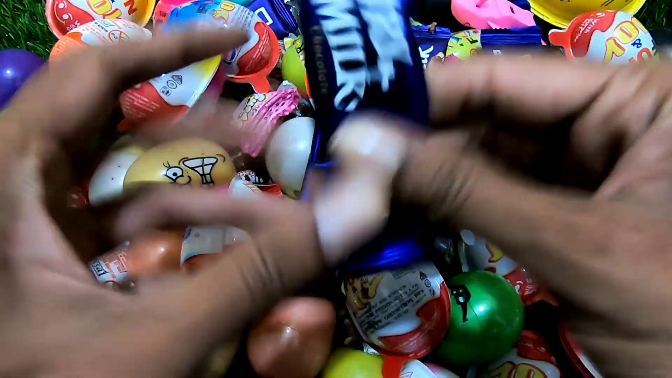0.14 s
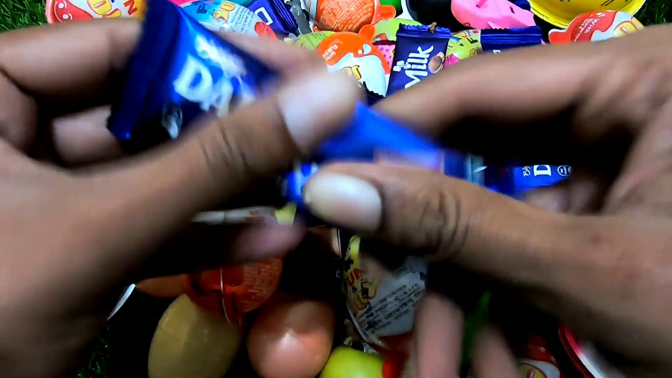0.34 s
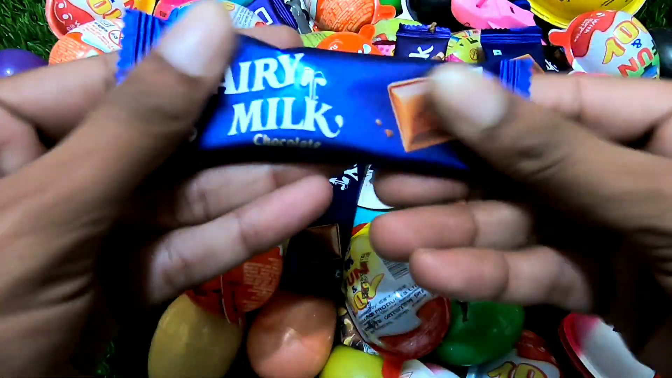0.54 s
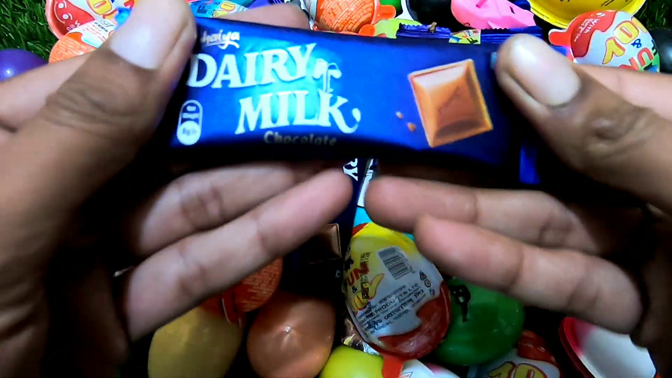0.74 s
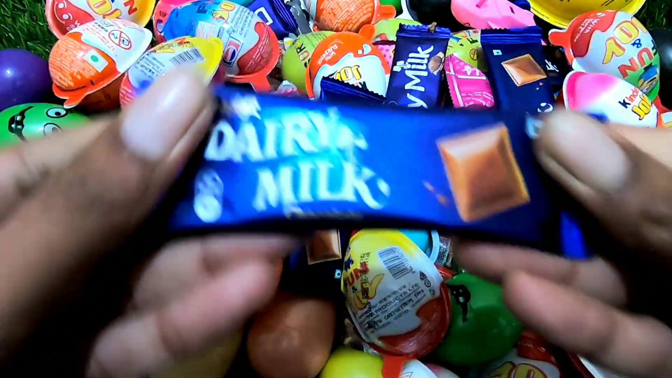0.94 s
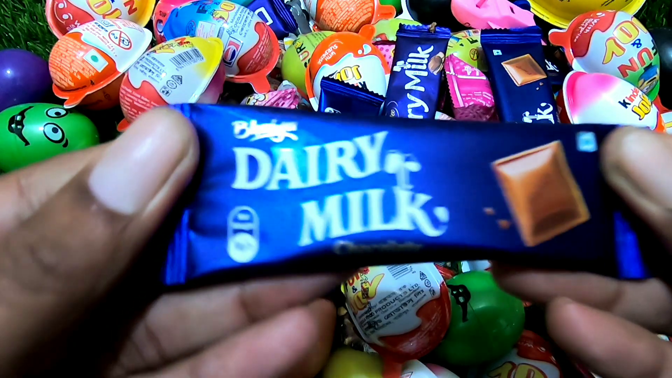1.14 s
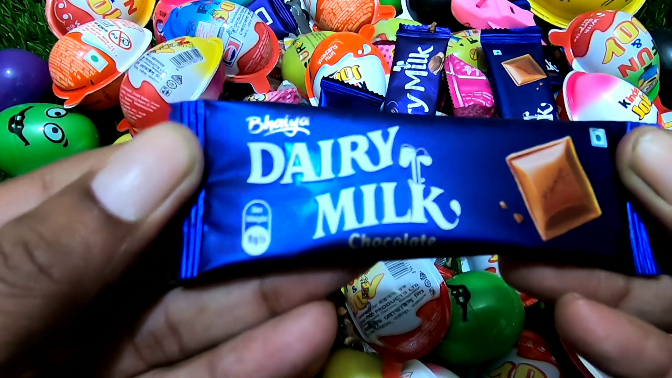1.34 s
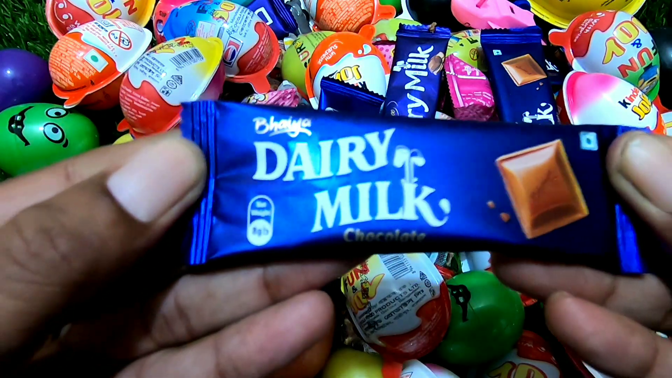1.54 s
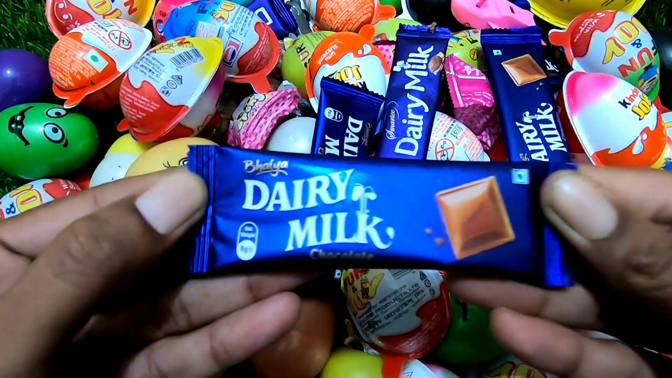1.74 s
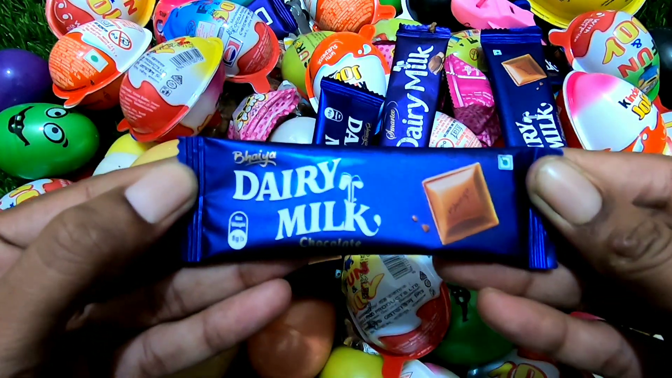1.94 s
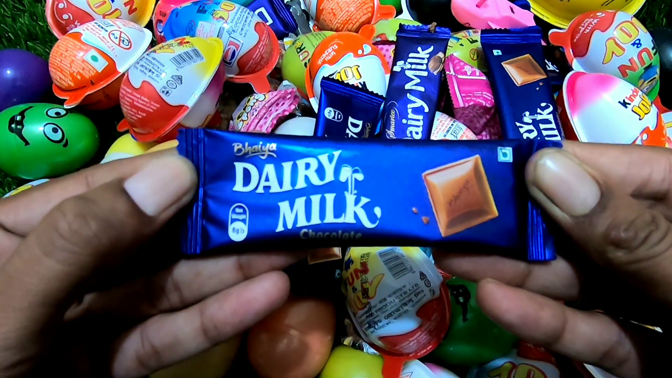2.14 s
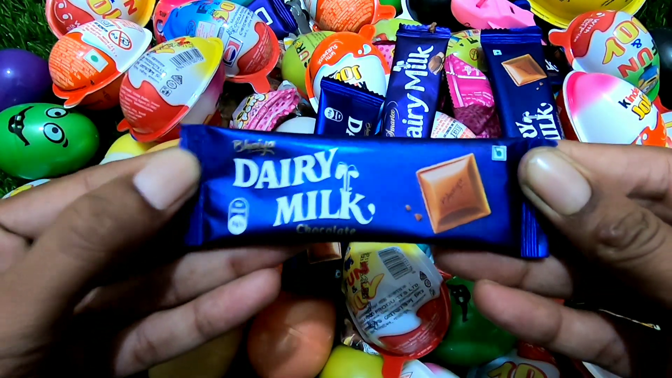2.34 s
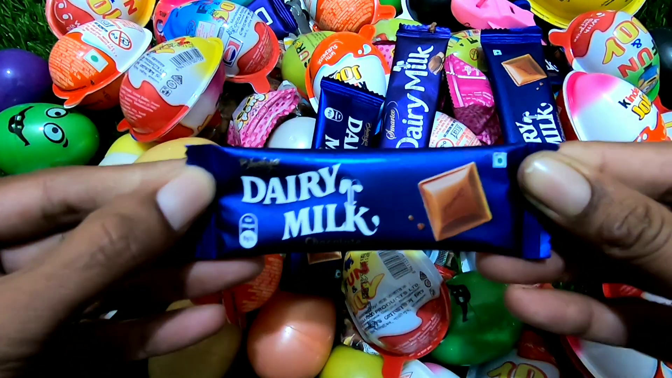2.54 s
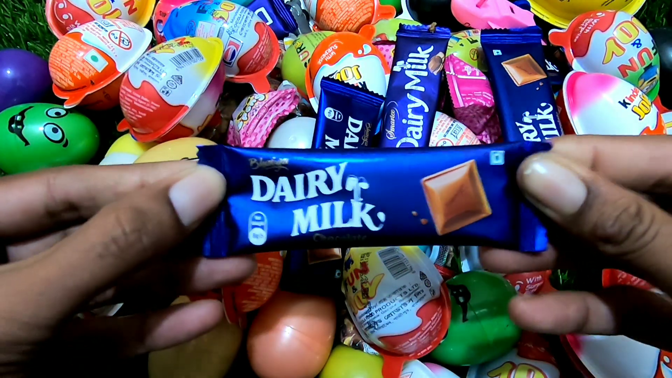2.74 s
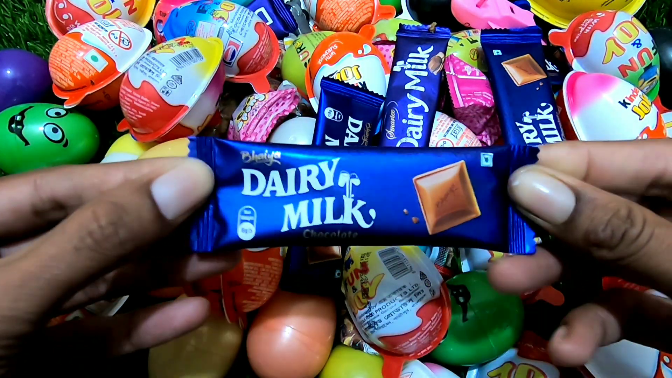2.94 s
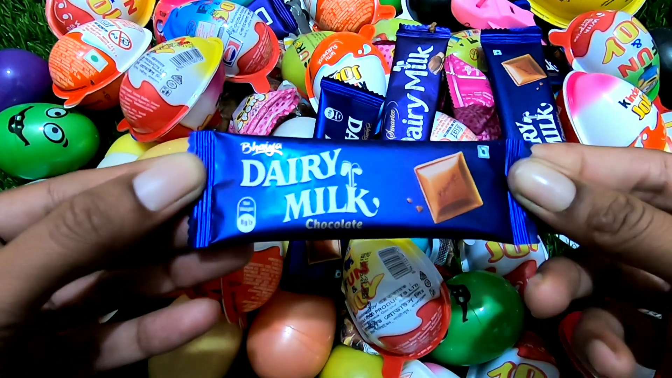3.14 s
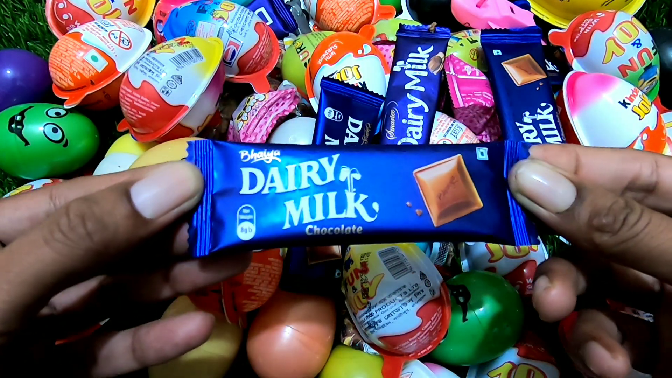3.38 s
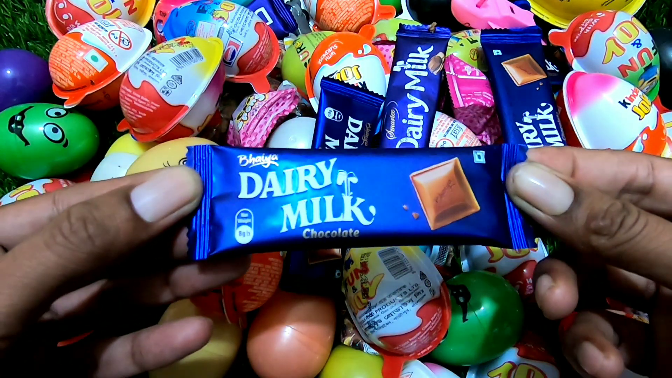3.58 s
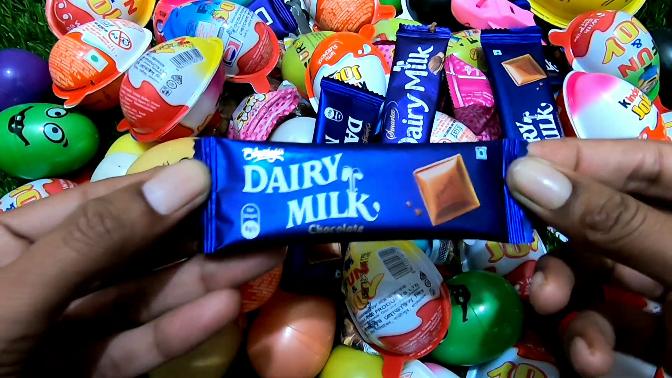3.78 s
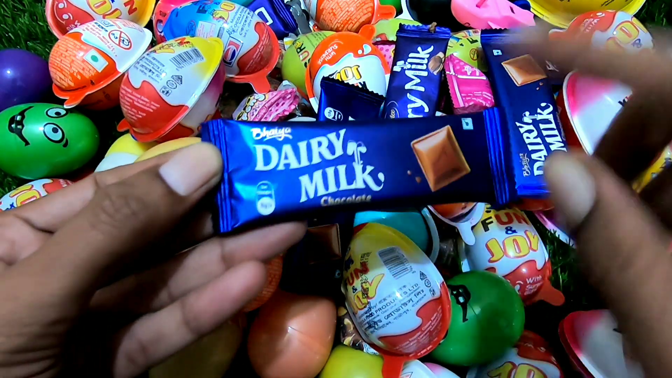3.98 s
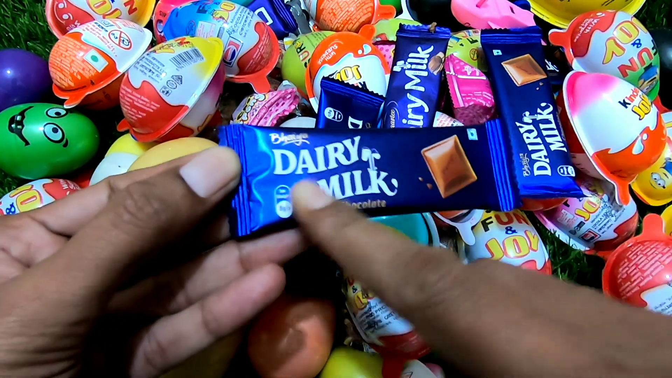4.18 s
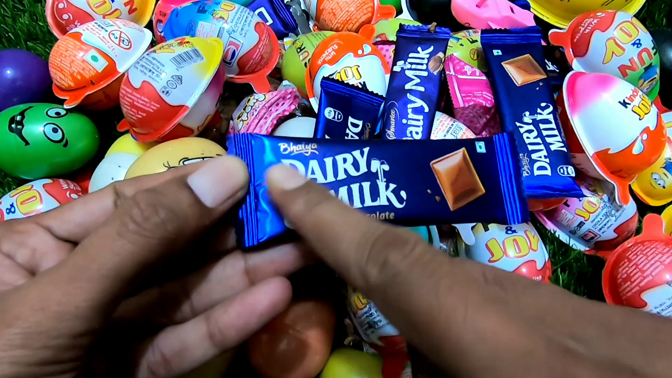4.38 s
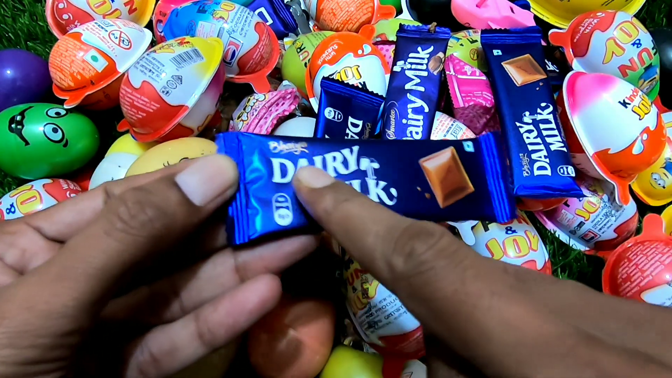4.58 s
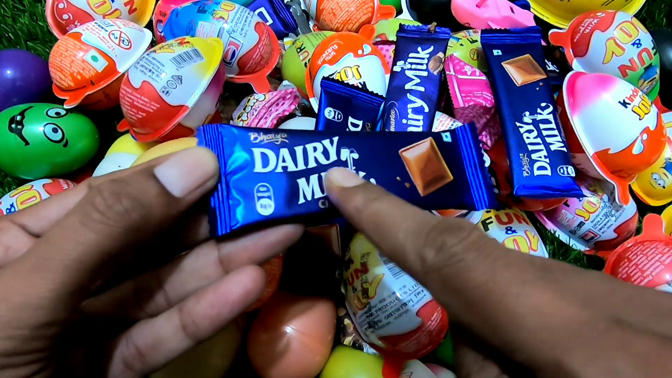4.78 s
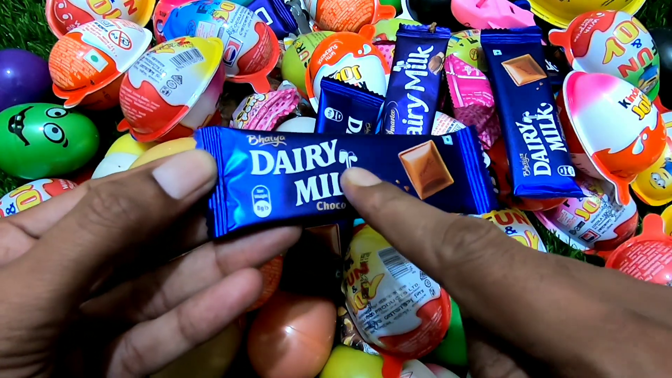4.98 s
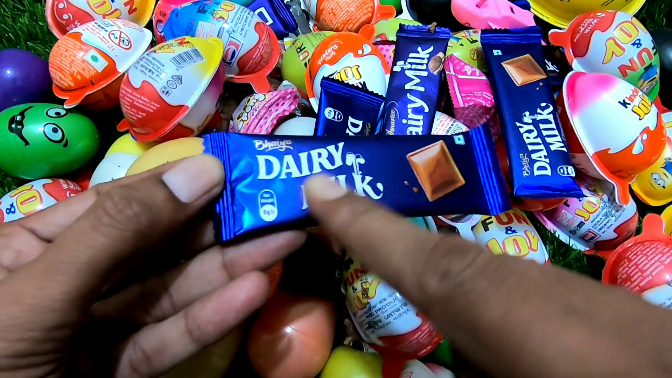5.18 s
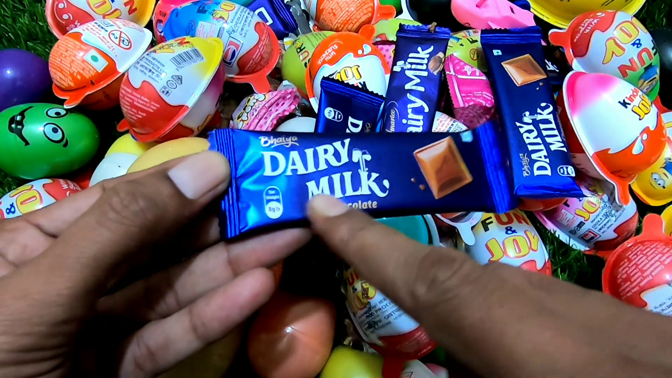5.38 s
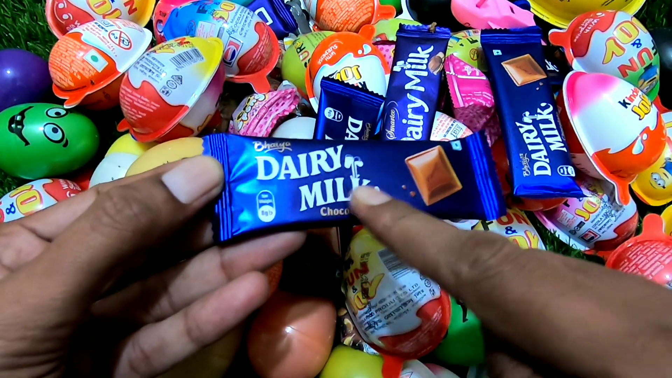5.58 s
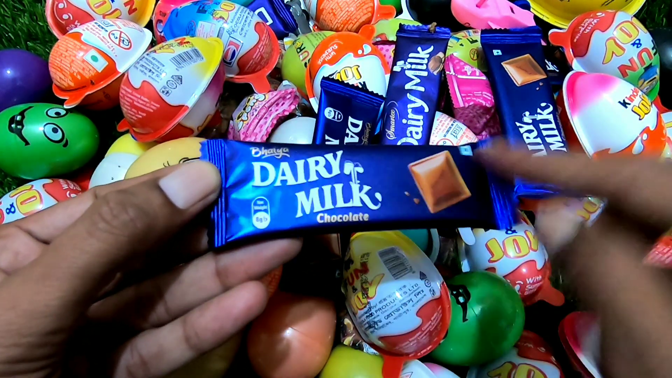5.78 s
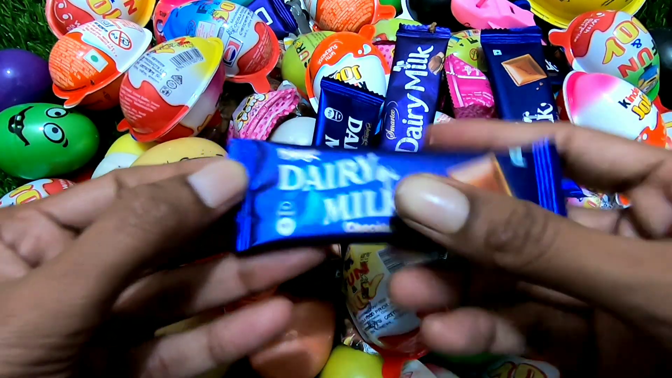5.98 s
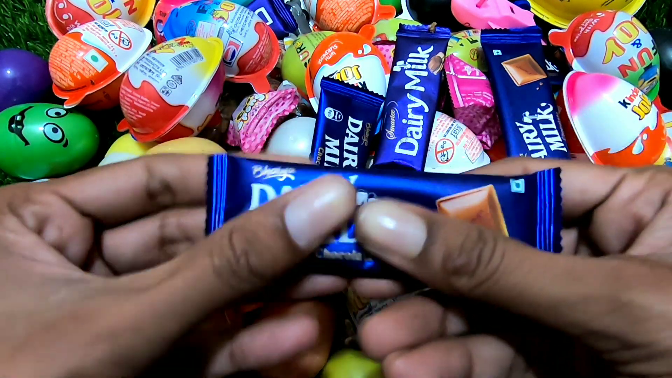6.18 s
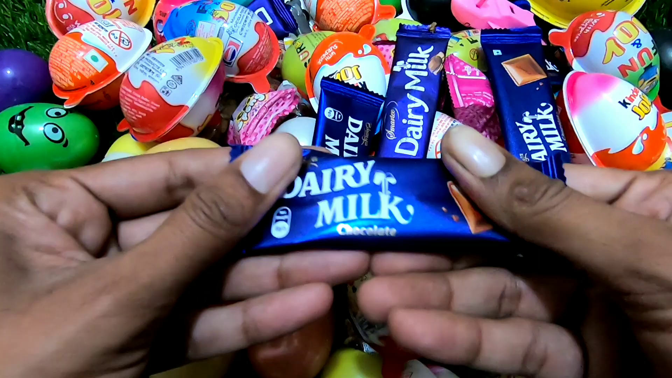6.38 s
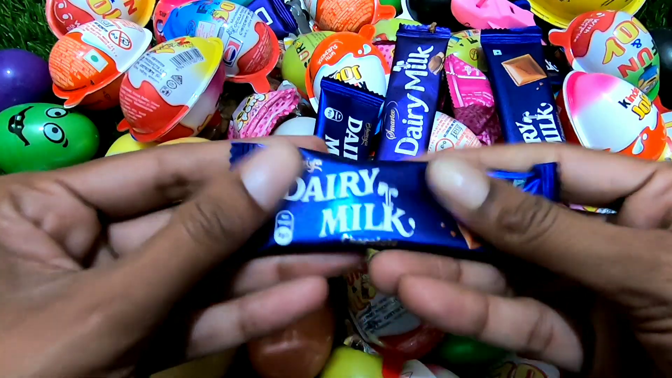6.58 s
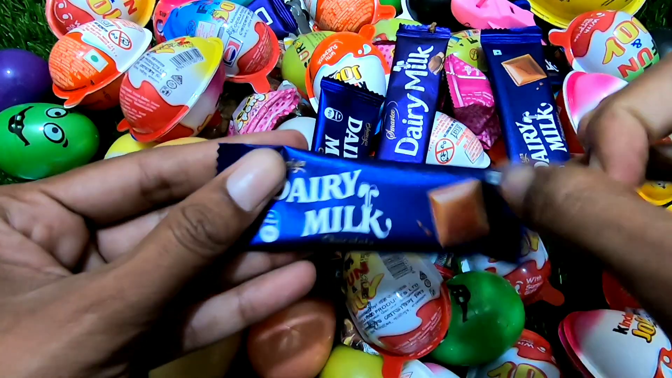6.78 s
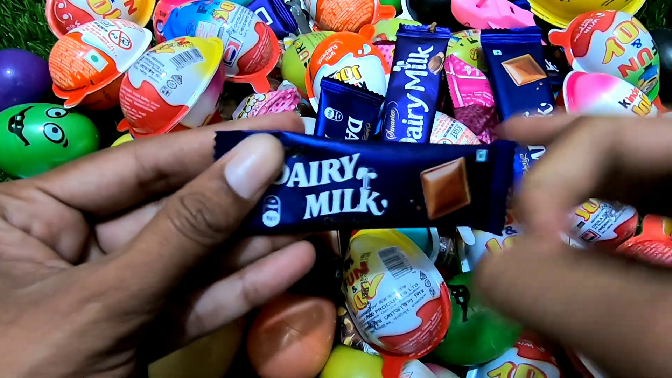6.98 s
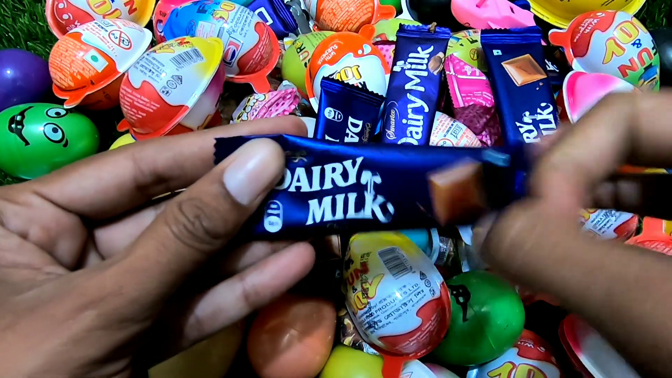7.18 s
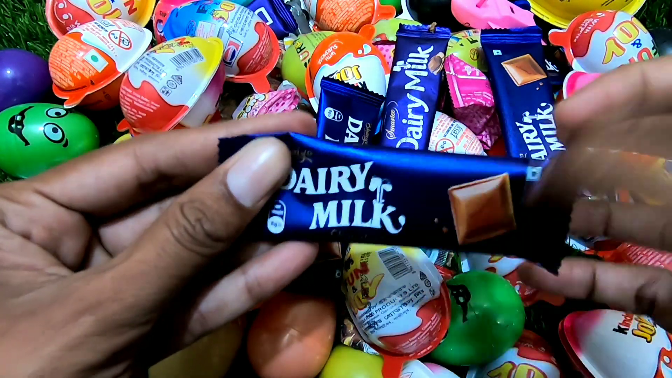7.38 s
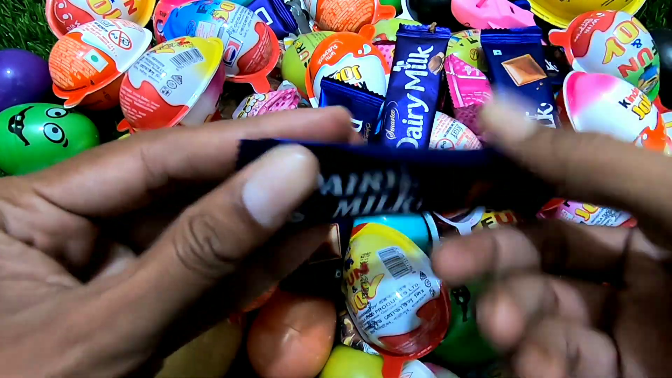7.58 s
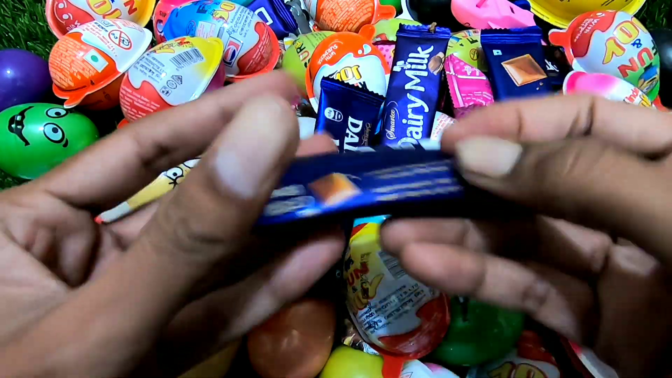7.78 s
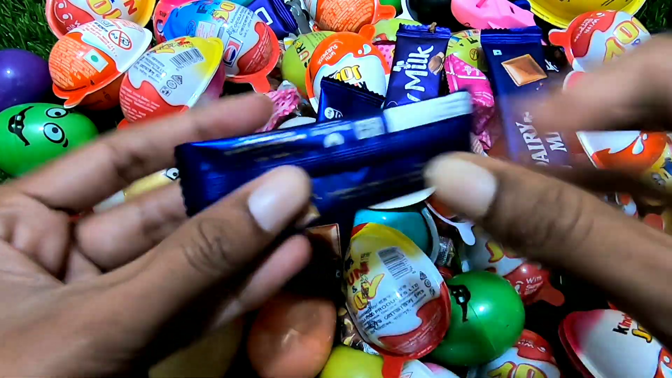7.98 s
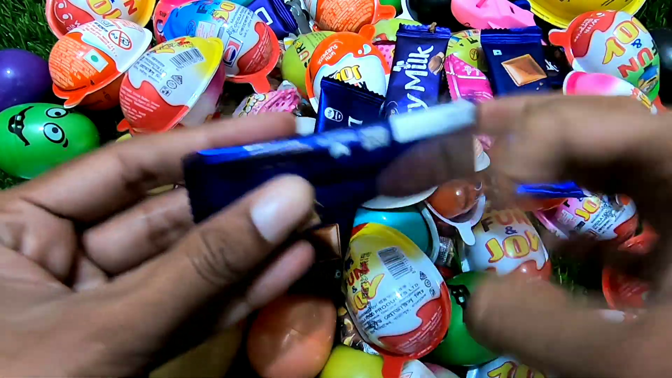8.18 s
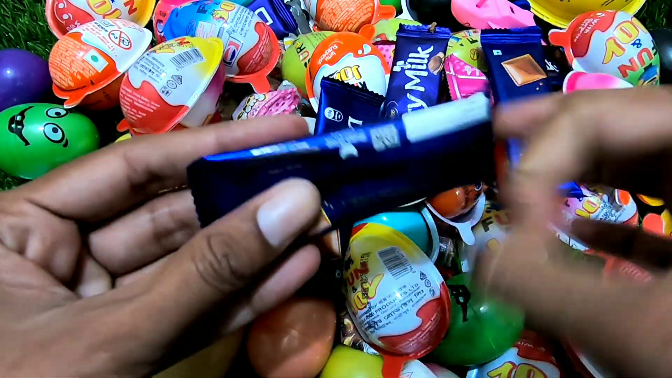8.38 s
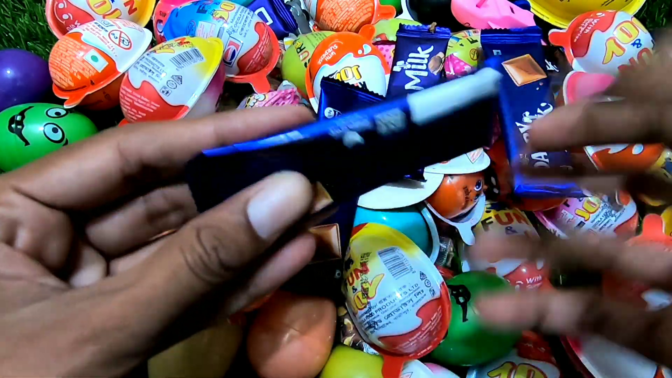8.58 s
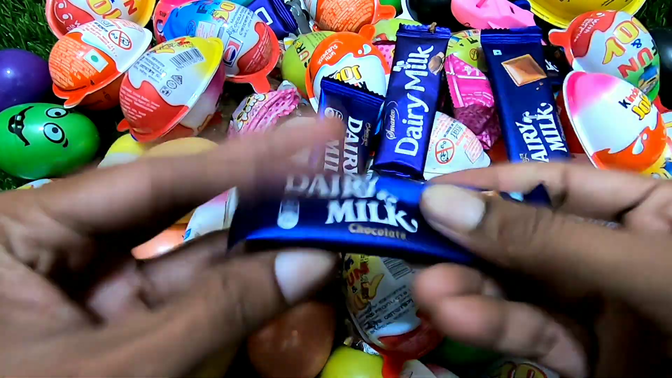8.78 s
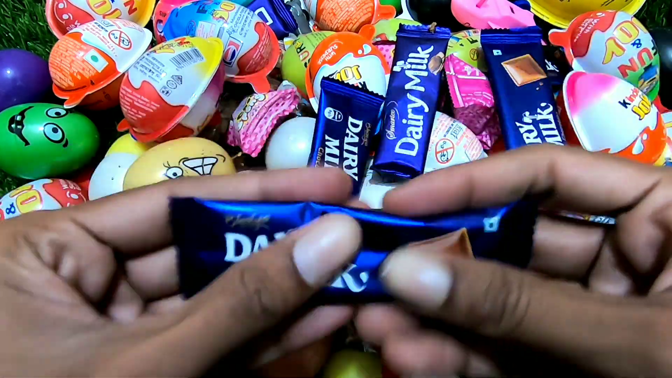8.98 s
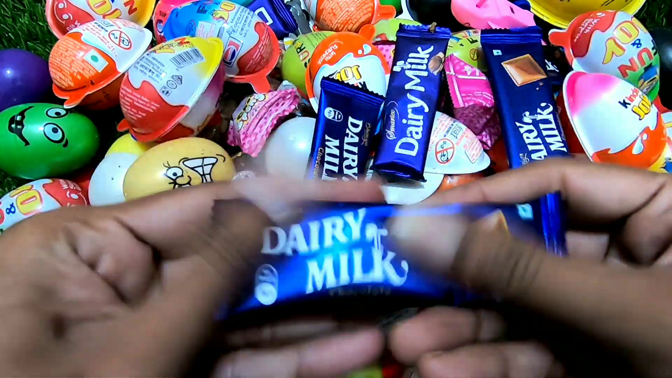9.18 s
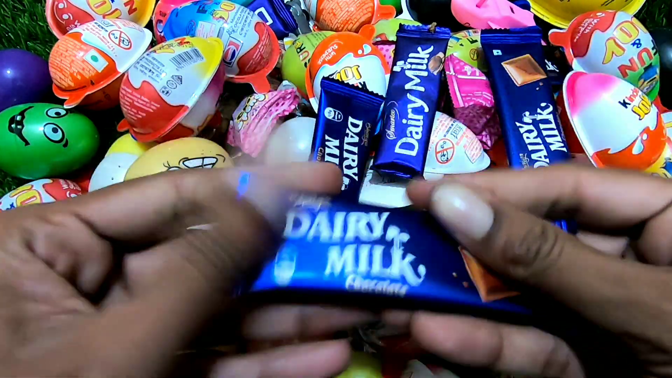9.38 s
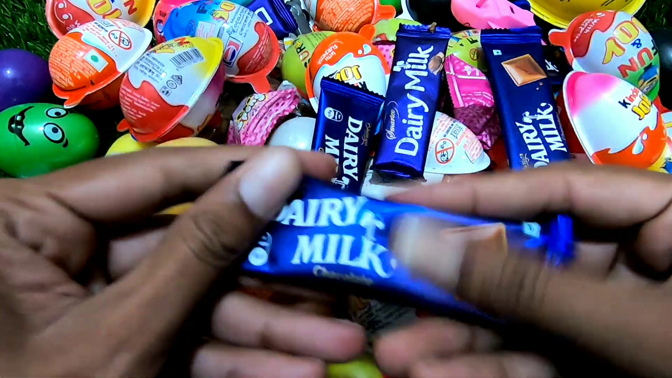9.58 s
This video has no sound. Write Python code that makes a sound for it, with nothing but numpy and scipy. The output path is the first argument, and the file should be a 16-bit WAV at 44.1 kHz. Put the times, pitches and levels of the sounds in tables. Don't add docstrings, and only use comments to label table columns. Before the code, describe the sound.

Hands handle a small film-wrapped bar right at the microphones. A flurry of crisp snaps gives way after one second to near stillness, with airy finger glides and a few ticks. Crinkling returns under the thumbs, followed by hard smacks and taut papery snaps, ending in thick crunchy rustle. The short room tail is dull; deep uneven traffic murmurs behind, with barely audible whistle and far horn.

```python
import sys
import numpy as np
from scipy import signal
from scipy.fft import rfft, irfft
from scipy.io import wavfile
from scipy.ndimage import uniform_filter1d

SR = 44100
rng = np.random.default_rng(int(sys.argv[2]) if len(sys.argv) > 2 else 0)


def unload_audio(sound):
    columns = np.transpose(np.atleast_2d(sound))
    steps = np.round(np.clip(columns, -1, 1) * 32767)
    wavfile.write(sys.argv[1], SR, steps.astype(np.int16))


def rack_gain(trim_db):
    fader = np.asarray(trim_db, float)
    return 10 ** (fader / 20)


N = 424683

# pitch_hz, level_db
SNAP_COLOUR = [(240, -45.5), (400, -10), (893, -4.5), (1130, -1.5), (1840, -2.5), (2800, -1), (3640, -4),
               (5870, -3.5), (7400, -15.5), (9920, -6.5), (13700, -31.5), (16000, -34.5)]
# pitch_hz, level_db
RUSTLE_COLOUR = [(290, -53), (500, -5.5), (1110, -4.5), (2260, -4), (3540, -0.5), (5800, -5), (7420, -12),
                 (9920, -5.5), (14200, -19.5)]
# pitch_hz, level_db
GLIDE_COLOUR = [(900, -21.5), (1800, -7.5), (3100, 0.5), (4200, -4), (5700, -2.5), (7400, -18.5),
                (9700, -15), (14500, -41.5)]
# pitch_hz, level_db
AIR_COLOUR = [(180, -27.5), (300, -3.5), (502, -26), (670, -14.5), (800, -10.5), (970, -17.5), (1220, -14),
              (3570, -26), (14000, -59.5)]
# pitch_hz, level_db
WIDTH = [(80, -20), (200, -19), (380, 1.5), (1290, -2), (2380, -8.5), (4400, -4.5), (8120, 6.5),
         (15000, -1.5)]
# pitch_hz, level_db
TILT = [(60, -3.5), (200, -4.5), (380, 1.5), (2380, 0), (4400, -7), (8120, -6), (15000, 3.5)]
# start_s, peak_db, pitch_hz, sheen_db
TURNING = [(0.0049, -11.0, 3290, -7), (0.0222, -18, 3280, -14.5), (0.0462, -24, 2720, -23),
           (0.0487, -20.5, 2936, -13.5), (0.056, -11, 3550, -9.5), (0.06, -12.5, 3810, -1.5),
           (0.0652, -5.5, 3680, -12), (0.0683, -9.5, 3665, -16), (0.0841, -13, 3730, -12),
           (0.0891, -3.5, 3510, -12), (0.0943, -14, 3640, -11.5), (0.1007, -23.5, 3960, -9),
           (0.11, -17.5, 5040, -13.5), (0.1253, -12, 3440, -13), (0.132, -8, 2630, -3),
           (0.139, -14, 4260, -10.5), (0.148, -9.5, 3660, -4), (0.1762, -18.5, 3620, -2),
           (0.1815, -16, 5000, -0.5), (0.2356, -39, 3890, -15), (0.2584, -24, 2530, -16),
           (0.2689, -24, 3960, -18), (0.282, -22, 4150, -22), (0.2863, -29.5, 3490, -8),
           (0.3582, -22, 2500, -20), (0.3777, -28.0, 3020, -22), (0.3859, -29, 3120, -20),
            (0.4058, -13.5, 2780, -21.5), (0.4083, -9, 2920, -17), (0.4124, -14, 4070, -5),
            (0.4228, -13, 3450, -4.5), (0.4309, -23, 4430, -6.5), (0.472, -12.5, 3200, -8),
            (0.4777, -6.5, 4230, -6.5), (0.505, -19.5, 3030, -14), (0.532, -7.5, 3270, -12.5),
            (0.5649, -14.5, 4170, -6), (0.5692, -7.5, 4200, -10), (0.5904, -10.5, 3580, -14.5),
            (0.596, -14, 3840, 3), (0.6237, -14.5, 4440, -14), (0.6357, -15.5, 2940, -9),
            (0.6559, -9.5, 3230, -5.5), (0.6632, -18.5, 3060, -25), (0.7012, -17, 3700, -7),
            (0.7231, -9.5, 4140, -13), (0.7289, -13.5, 3510, -7.5), (0.731, -20.5, 5330, -4.5),
            (0.7563, -21, 2850, -20), (0.7848, -14, 4150, -12.5), (0.8891, -15, 3100, -27),
            (0.8937, -9, 3000, -15.5), (0.9177, -15.5, 3260, -4), (0.932, -17.5, 3650, -10),
            (0.9354, -15.5, 2720, -10), (0.9502, -12, 3440, -8.5), (0.9815, -17.5, 3530, -18),
            (1.079, -25, 3770, -20), (1.1051, -19, 3240, -16), (1.1506, -31.5, 2380, -32),
            (1.1639, -31, 3070, -37)]
# start_s, peak_db, pitch_hz, sheen_db
HOLDING = [(1.2435, -34.5, 2460, -31), (1.319, -24.5, 5640, -5), (1.375, -33.5, 2410, -32),
           (1.4215, -35, 2310, -27), (1.4311, -34, 2860, -10), (1.4866, -25.5, 1890, -35),
           (1.54, -18.5, 5800, -9), (1.6858, -17.5, 3900, -14), (1.697, -19.5, 3800, -25),
           (1.7269, -33, 2620, -24), (1.7498, -23.5, 3340, -9), (1.7814, -32.5, 2880, -15),
           (2.428, -23.5, 4660, -17), (2.444, -25, 2980, -6), (2.5118, -33, 3600, -23),
           (2.7534, -24.5, 2800, -18.5), (3.1598, -22.5, 4650, -15), (3.2306, -34, 3800, -34),
           (3.771, -39, 2890, -31), (3.801, -37, 4240, -16), (3.8447, -24.5, 2630, -31),
           (3.9266, -25, 3730, -37), (3.9404, -19.0, 3530, -20), (3.9453, -21, 3660, -11),
           (3.9745, -27, 2330, -13), (4.0006, -16.5, 4030, -16), (4.5112, -20.5, 3550, -22),
           (4.5713, -28, 2930, -34), (4.6832, -12, 3300, -11.5), (4.8723, -13, 3400, -12.5),
           (4.916, -11.5, 2940, -13), (5.9113, -24.5, 2890, -3.5), (5.9143, -24.5, 3800, -16)]
# start_s, peak_db, pitch_hz, sheen_db
PINCHING = [(6.0857, -14.5, 4070, -21), (6.09, -20, 2490, -13), (6.1162, -19, 3500, -20),
            (6.12, -12, 2780, -13), (6.1384, -19.5, 2650, -14), (6.143, -17.5, 3920, -16),
            (6.1808, -22.5, 2870, -15), (6.2726, -21, 2800, -28), (6.2845, -4.5, 3430, -19),
            (6.293, -20, 2280, -23), (6.322, -22, 3330, -15), (6.3627, -24, 3820, 8),
            (6.3794, -11, 3680, -13), (6.405, -9, 4200, -2), (6.41, -13.5, 4270, -9),
            (6.4152, -8.5, 3700, -9), (6.4207, -13, 3080, -8), (6.4282, -9.5, 3570, -8),
            (6.5455, -22, 3800, -11), (6.555, -24, 3070, -17), (6.578, -23, 2240, -5),
            (6.6217, -25, 3270, -15), (6.6669, -20, 3870, -2), (6.702, -21, 3960, -8),
            (6.7276, -11.5, 3020, -10), (6.7465, -12.5, 4570, -13), (6.756, -15, 4170, 1),
            (6.775, -16.5, 3370, -3), (6.7775, -18.5, 3900, -18), (6.8127, -11, 3420, -31),
            (6.8214, -12, 4650, -6), (6.8304, -21, 3000, -23), (6.8342, -12, 4000, -14),
            (6.8411, -10.5, 3630, -18), (6.853, -8.5, 3000, -24), (6.8755, -15, 3320, -8.5),
            (6.8908, -22, 4660, -7), (6.9175, -22.5, 4450, -8)]
# start_s, peak_db, pitch_hz, sheen_db
SLAPPING = [(7.1172, -3, 3300, -14), (7.1201, -10.5, 3700, -19), (7.1259, -11.5, 3410, -13),
            (7.1289, -16, 3400, -7), (7.212, -14.5, 4160, -25), (7.2879, -25, 3360, -11),
            (7.349, -2, 3680, -10), (7.3581, -11, 3280, -12), (7.409, -22, 3260, -17),
            (7.4197, -16, 3300, -18), (7.4283, -13, 3540, -14.5), (7.5466, -22.5, 3680, -14),
            (7.7146, -23, 3600, -10), (7.7303, -24, 2040, -13), (7.751, -11, 3100, -8.5),
            (7.793, -16.5, 5100, -14), (7.8053, -10, 4400, -16), (7.821, -24, 3290, -25),
            (7.9362, -23, 3290, -5), (7.9404, -23, 2750, -11), (7.9544, -5, 3500, -6.5),
            (7.9763, -18, 3460, -1), (7.9843, -18, 2750, 4), (7.9897, -18, 2680, -12),
            (8.018, -15, 3270, -16), (8.0457, -13, 3980, -6), (8.0696, -20, 4220, -20),
            (8.2913, -2.5, 3450, -13), (8.3005, -16, 3900, -16), (8.3397, -13.5, 3080, -12),
            (8.4497, -22.5, 3100, -15), (8.5114, -4.5, 2300, -11), (8.5204, -4, 3150, -4),
            (8.5582, -13, 4230, 0), (8.5735, -11, 3120, -8), (8.5804, -11.5, 3800, -5),
            (8.5953, -17, 3630, -4), (8.6752, -25, 3760, -12), (8.7147, -17.5, 3670, -20),
            (8.7221, -19, 4080, -10)]
# start_s, peak_db, pitch_hz, sheen_db
SQUEEZING = [(8.7968, -25.5, 4690, -14), (8.8097, -14.5, 3620, -21), (8.8138, -15, 4340, -10),
             (8.8295, -11, 3740, -16), (8.834, -13, 3780, -22), (8.8464, -11.5, 4000, -15),
             (8.8536, -18, 3000, -11), (8.8827, -17, 2850, -3), (8.9034, -18, 3470, -16),
             (8.9285, -27, 1980, -13), (8.9335, -18, 2720, -14), (8.984, -16, 5100, -7.5),
             (8.9915, -22.5, 3660, -4), (9.0787, -13, 2400, -7.5), (9.0923, -16, 4410, -15),
             (9.1175, -22, 4630, -8), (9.1876, -11.5, 3520, -3.5), (9.203, -14.5, 2580, -15),
             (9.2171, -20, 3900, -12), (9.2332, -8.5, 2910, -15), (9.2485, -6.5, 4030, 0),
             (9.2543, -7.5, 4600, -15.5), (9.2581, -7.5, 3640, -18), (9.2752, -15.5, 3210, 0),
             (9.2868, -10.5, 3880, -10), (9.3026, -13, 3200, -6.5), (9.3085, -6, 3680, -27),
             (9.329, -8, 3100, -7.5), (9.3339, -13, 2650, -19), (9.3833, -23, 4720, 14),
             (9.3983, -15.5, 3800, -7.5), (9.4294, -25.5, 4340, -17), (9.4574, -21, 4150, -11),
             (9.4779, -21, 3040, -24), (9.5029, -21, 3500, -22), (9.5173, -6.5, 3840, -19),
             (9.5418, -18, 3590, -22), (9.5481, -19, 3750, -7), (9.5528, -13, 3080, -12.5),
             (9.5647, -15.5, 3100, -8.5), (9.5708, -11, 3240, -3), (9.5801, -11.5, 4660, -6),
             (9.5915, -7, 3900, -16), (9.6087, -12.5, 3330, -18), (9.622, -15, 4100, -14)]
# start_s, peak_db, pitch_hz
TICKS = [(0.4663, -17, 3660), (0.4975, -24.5, 2760), (6.301, -25, 1766), (6.6083, -33, 1890),
         (6.66, -23, 5430), (6.6955, -23, 4520), (7.1724, -24, 3790), (7.193, -23, 2930),
         (7.3051, -32, 2670), (7.6136, -36, 3790), (7.652, -33, 5560), (7.6876, -29, 1940),
         (7.7695, -22, 3270), (9.0737, -27, 4180), (9.2823, -17, 4820), (9.3712, -24, 2130),
         (9.4632, -22, 3700)]
# full_s, level_db, rise_s, hold_s
GRIPS = [(0.0, -42, 0.055, 0.15), (0.42, -44, 0.27, 0.1), (0.56, -50.5, 0.05, 0.23),
         (0.93, -42, 0.18, 0.0035), (6.14, -44.5, 0.19, 0.0026), (6.29, -48, 0.065, 0.083),
         (6.42, -43.5, 0.35, 0.0036), (6.75, -41, 0.53, 0.0017), (6.84, -43, .06, 0.0054),
         (7.14, -44, 0.11, 0.054), (7.36, -41.5, 0.043, 0.048), (7.74, -44.5, 0.22, 0.089),
         (7.97, -42.5, 0.073, 0.04), (8.32, -42, 0.065, 0.01), (8.53, -42.5, 0.031, 0.033),
         (8.83, -38.5, 0.12, 0.021), (9.09, -51.5, 0.4, 0.16), (9.26, -37.5, 0.093, 0.05),
         (9.53, -37, 0.18, 0.048)]
# full_s, level_db, rise_s, hold_s
TOUCHES = [(1.05, -52.5, 0.044, 0.04), (1.33, -63, 0.47, .02), (1.56, -60, 0.43, 0.011),
           (1.7, -56, 0.21, 0.055), (2.11, -61.5, 0.36, 0.0068), (2.47, -51, 0.14, 0.053),
           (2.67, -57, 0.45, 0.0083), (2.89, -63.5, 0.48, 0.0081), (3.12, -59.5, 0.65, 0.04),
           (3.75, -59, 0.052, 0.0031), (3.94, -57.5, 0.22, 0.15), (4.51, -61, 0.13, 0.14),
           (4.7, -56.5, .07, 0.076), (4.89, -59, 0.58, 0.21), (5.435, -62.5, .02, 0.2),
           (5.72, -55.5, 0.53, 0.078), (5.91, -51.5, 0.32, 0.0019)]
GRAIN_HZ = (1500, 2400, 3400, 4800, 6500)
# start_s, level_db
TRAFFIC = [(0.0, -34), (0.16, -36.5), (1.8, -38), (1.88, -43.5), (1.98, -33), (3.3, -40.5), (3.38, -57.5),
           (3.43, -46.5), (6.01, -44.5), (6.49, -36.5), (6.57, -45.5), (6.7, -34), (6.76, -39.5),
           (7.83, -42), (9.31, -56), (9.63, -48.5)]
# pitch_hz, width_hz, level_db
DEEP_MODES = [(26, 3.4, -15.5), (53.5, 9, -4), (86.2, 9.9, -6)]
# pitch_hz, width_hz, level_db
UPPER_MODES = [(125.3, 18, 1.5), (170, 33, 0), (215.8, 24, -8), (250.8, 9, -12), (327, 100, -19)]
# start_s, level_db
AIR_LEVEL = [(0, -56), (1.2, -53.5), (2.6, -57), (3.5, -59.5), (9.63, -55.5)]
# start_s, peak_db, pitch_hz
KNOCKS = [
    (1.482, -33.5, 151.7),
    (6.088, -27.5, 170),
    (6.134, -30, 262),
    (6.81, -30, 141),
    (7.116, -20, 235),
    (7.347, -18.5, 273),
    (8.2898, -27, 252),
    (8.51, -26.5, 170),
]
# start_s, peak_db, pitch_hz
SLAP_RINGS = [(7.116, 2, 3510), (7.3465, -3.5, 3000), (7.347, -5, 4420), (8.2893, -9, 1660),
              (8.2893, -7.5, 2830), (8.290, -4.5, 4500), (8.5095, -5, 1810), (8.510, -7, 4200),
              (2.7528, -26, 2970), (1.4858, -29, 1520)]
# start_s, level_db
INSECT_LEVEL = [(3.7, -84), (4.1, -71), (5.5, -71), (6.0, -80)]
# start_s, peak_db, pitch_hz
PAD_TAPS = [
    (4.5094, -24.5, 1330),
    (7.347, -7.5, 1684),
    (7.3485, -20, 620),
    (8.774, -37, 1090),
]
# start_s, level_db
HORN_LEVEL = [(5.42, -85), (5.5, -62), (5.8, -61), (6.05, -62), (6.3, -60), (7.1, -62), (7.2, -120)]
# multiple, level_db
HORN_PARTIALS = [(1, -5), (7, -8), (8, 0), (9, 3)]

BUCKLE_S, LEAD_S = .0005, .002
SLAP_HOLD_S, SLAP_FROM_DB = .002, -7
FLIP_RING = 4
SHEEN_HZ, TICK_SHEEN_DB = 7100, -13.5
RISE_DB, GRIP_FALL_DB_PER_S, TOUCH_FALL_DB_PER_S = 33.5, 131, 154
STILL_DB = -84
GRAINS_PER_S, GRAIN_TINT, RUSTLE_TOP_HZ = 2200, 1.2, 14400
ROOM_T60_S, ROOM_DB = 0.16, -18
UPPER_FOLLOWS, UPPER_DB, SWELL_DB = 0.53, -48, 1
UPPER_RECEDES_DB_PER_S = 0.28
RING_DECAY_S = .0016
INSECT_HZ, HORN_HZ = 3784, 372


def rms_one(x):
    return x / np.sqrt(np.mean(x ** 2) + 1e-20)


def in_time(rows):
    s, *columns = np.transpose(rows)
    return [np.interp(np.arange(N) / SR, s, c) for c in columns]


def colour(x, points, share=1):
    hz = np.maximum(np.arange(1025) * SR / 2048, 1)
    point_hz, point_db = np.array(points).T
    db = share * np.interp(np.log(hz), np.log(point_hz), point_db)
    cepstrum = irfft(db * np.log(10) / 20)
    cepstrum[1:1024] *= 2
    cepstrum[1025:] = 0
    impulse = irfft(np.exp(rfft(cepstrum)))
    return signal.oaconvolve(np.atleast_2d(x), impulse[None], axes=1)[:, :x.shape[-1]]


def resonance(x, hz, width):
    r = np.exp(-np.pi * width / SR)
    feedback = [1, -2 * r * np.cos(2 * np.pi * hz / SR), r * r]
    return signal.lfilter([(1 - r * r) / 2, 0, (r * r - 1) / 2], feedback, x)


def drift(rate):
    knots = rng.standard_normal(int(N / SR * 100) + 2)
    return np.interp(np.arange(N) / SR * np.clip(rate, 0, 99), np.arange(len(knots)), knots)


def wide(mid, side, extra_db):
    return mid + rack_gain(extra_db) * colour(side, WIDTH) * [[1], [-1]]


def below_top(x):
    return signal.sosfilt(signal.butter(12, RUSTLE_TOP_HZ, fs=SR, output="sos"), x)


def buckle(crease, noise, chance, slap, t):
    _, peak_db, centre_hz, _ = crease
    length, _, overtone = chance
    after = np.maximum(t - LEAD_S, 0)
    released = np.maximum(after - slap * SLAP_HOLD_S, 0)
    lasts = BUCKLE_S * rack_gain(0.1 * (peak_db + 10) + 2.0 * length + 6 * slap)
    burst = (1 - np.exp(-after / lasts)) * np.exp(-(released / lasts) ** 1.2)
    burst += (1 - slap) * rack_gain(-17.5) * np.exp(-np.abs(t - LEAD_S) / 0.002)
    tail = rack_gain(-17) * np.exp(-after / .005) * (1 - np.exp(-after / .0005))
    shaken = noise * (burst + tail)
    flip_at = 110
    shaken[:, flip_at] += 2.3 * (1 - slap)
    strike = FLIP_RING * (1 - slap) * (t == t[flip_at])
    patch = resonance(shaken, centre_hz, centre_hz * 0.69)
    struck = resonance(shaken + strike, centre_hz, 700)
    second_hz = np.clip(centre_hz * np.exp(0.4 * overtone), 900, 6500)
    second = -1.3 * resonance(shaken, second_hz, 600)
    return 0.38 * shaken + patch + second + struck


def snaps():
    ticks = [(*tick, TICK_SHEEN_DB) for tick in TICKS]
    creases = np.array(TURNING + HOLDING + PINCHING + SLAPPING + SQUEEZING + ticks)
    t = np.arange(800) / SR
    blows = np.array(KNOCKS)[:, 0]
    noises = rng.standard_normal((len(creases), 2, len(t)))
    chances = rng.standard_normal((len(creases), 3))
    near_blow = np.abs(creases[:, :1] - blows).min(axis=1) < .004
    slapped = near_blow & (creases[:, 1] > SLAP_FROM_DB)
    raw = []
    for crease, noise, chance, slap in zip(creases, noises, chances, slapped):
        raw += list(buckle(crease, noise, chance, slap, t))
    raw = colour(np.array(raw), SNAP_COLOUR, 0.99)

    body = signal.sosfilt(signal.butter(8, SHEEN_HZ, "low", fs=SR, output="sos"), raw)
    sheen = signal.sosfilt(signal.butter(8, SHEEN_HZ, "high", fs=SR, output="sos"), raw)
    body_rms, sheen_rms = (np.std(x[::2, 60:220], axis=1) for x in (body, sheen))
    sheen_gain = rack_gain(creases[:, 3] - 1.0) * body_rms / sheen_rms
    film = body + sheen * np.repeat(sheen_gain, 2)[:, None]
    mids = film[::2]
    sides = rack_gain(-5) * colour(film[1::2], WIDTH)

    out = np.zeros((2, N + 2 * len(t)))
    for (s, peak_db, _, _), mid, side, place, slap in zip(creases, mids, sides, chances[:, 1], slapped):
        if slap:
            blow_s = blows[np.abs(blows - s).argmin()]
            at = len(t) + round(blow_s * SR) - round(LEAD_S * SR) - 20
        else:
            at = len(t) + round(s * SR) - np.abs(mid).argmax()
        pair = (mid + side * [[1], [-1]]) * rack_gain(0.49 * place * np.array([[1], [-1]]))
        out[:, at:at + len(t)] += rack_gain(peak_db + 0.76 - 1.1 * slap) / np.abs(mid).max() * pair
    return out[:, len(t):len(t) + N]


def handling():
    t = np.arange(0, N, 50) / SR
    power = rack_gain(2 * STILL_DB)
    for rows, fall in ((GRIPS, GRIP_FALL_DB_PER_S), (TOUCHES, TOUCH_FALL_DB_PER_S)):
        for s, level_db, rise, hold in rows:
            climb_db = RISE_DB * np.maximum(s - t, 0) / max(rise, .005)
            fall_db = fall * np.maximum(t - s - hold, 0)
            power = power + rack_gain(2 * (level_db - climb_db - fall_db))
    return np.interp(np.arange(N) / SR, t, 10 * np.log10(power))


def crackle():
    born = rng.random(N) < GRAINS_PER_S * rack_gain(4.0 * drift(45)) / SR
    sizes = born * rack_gain(3.6 * np.minimum(rng.exponential(1, N), 2.2))
    dealt = rng.integers(0, len(GRAIN_HZ), N)
    noise = rng.standard_normal((2, N))
    keep = np.exp(-1 / (.0005 * SR))
    puffs = [signal.lfilter([1], [1, -keep], sizes * (dealt == k) + 1e-18) for k in range(len(GRAIN_HZ))]
    even = np.sqrt(uniform_filter1d(sum(puffs) ** 2, size=4000) + 1e-3)
    tinted = 0
    for puff, hz in zip(puffs, GRAIN_HZ):
        grain = puff * noise
        tinted = tinted + .5 * grain + GRAIN_TINT * 2 * resonance(grain, hz, 0.66 * hz)
    mid, side = colour(tinted / even, RUSTLE_COLOUR)
    return wide(mid, side, -2.5) / np.std(mid) * rack_gain(7.0)


def glide():
    mid, side = colour(rack_gain(3.6 * drift(33)) * rng.standard_normal((2, N)), GLIDE_COLOUR)
    return wide(mid, side, -2.5) / np.std(mid) * rack_gain(1.0)


def rustle():
    level_db = handling()
    firm = np.clip((level_db + 55) / 15, 0, .9)
    return rack_gain(level_db) * below_top(np.sqrt(firm) * crackle() + np.sqrt(1 - firm) * glide())


def room(x):
    keep = rack_gain(-120 / (ROOM_T60_S * SR))
    power = signal.lfilter([1 - keep], [1, -keep], np.mean(x ** 2, axis=0))
    late = np.sqrt(np.roll(power, 200))
    mid, side = colour(rng.standard_normal((2, N)), SNAP_COLOUR, 0.93)
    return rack_gain(ROOM_DB) * below_top(late * wide(mid, side, 0.5)) / np.std(mid)


def street():
    out = 0
    deep_db, = in_time(TRAFFIC)
    receding_db = UPPER_RECEDES_DB_PER_S * (np.arange(N) - N / 2) / SR
    upper_db = UPPER_DB + UPPER_FOLLOWS * (deep_db - deep_db.mean()) - receding_db
    for modes, level_db in ((DEEP_MODES, deep_db), (UPPER_MODES, upper_db)):
        boom = 0
        for hz, width, db in modes:
            once = resonance(rng.standard_normal((2, N)), hz, width)
            boom = boom + rack_gain(db) * rms_one(resonance(once, hz, 2 * width))
        mid, side = rms_one(boom) * rack_gain(level_db + SWELL_DB * drift(6.6))
        out = out + mid + rack_gain(-16.5) * side * [[1], [-1]]
    return signal.sosfilt(signal.butter(4, 21, "high", fs=SR, output="sos"), out)


def air():
    mid, side = colour(rng.standard_normal((2, N)), AIR_COLOUR)
    return wide(mid, side, 0.71) / np.std(mid) * rack_gain(in_time(AIR_LEVEL)[0] + 1.0 * drift(2.5))


def knocks():
    t, out = np.arange(N) / SR, np.zeros(N)
    for s, peak_db, hz in KNOCKS:
        after = np.maximum(t - s - .0018, 0)
        thud = np.sin(2 * np.pi * hz * after) * np.exp(-after / 0.0022)
        upper = np.sin(2 * np.pi * 1.93 * hz * after) * np.exp(-after / 0.00084)
        out += rack_gain(peak_db + 9.0) * (thud + upper) * (1 - np.exp(-after / 0.00074))
    return out


def slap_rings():
    t, out = np.arange(N) / SR, np.zeros(N)
    for s, peak_db, hz in SLAP_RINGS:
        after = np.clip(t - s, 0, .05)
        swell = np.exp(-after / RING_DECAY_S) * (1 - np.exp(-after / 0.00043))
        out += rack_gain(peak_db) * np.sin(2 * np.pi * hz * after) * swell
    return out


def insect():
    phase = 2 * np.pi * np.cumsum(INSECT_HZ + 6 * drift(40)) / SR
    return rack_gain(in_time(INSECT_LEVEL)[0] + 2 * drift(8)) * np.sin(phase)


def pad_taps():
    t, out = np.arange(N) / SR, np.zeros(N)
    for s, peak_db, hz in PAD_TAPS:
        cycles = hz * np.maximum(t - s, 0)
        out += rack_gain(peak_db) * np.sin(2 * np.pi * cycles) * np.exp(-cycles / 1.6)
    return out


def horn():
    away_s = np.clip(np.arange(N) / SR - 6.2, 0, None)
    phase = 2 * np.pi * np.cumsum(HORN_HZ * (1 + .005 * drift(70) + .003 * drift(4))) / SR
    tone = 0
    for k, db in HORN_PARTIALS:
        tone = tone + rack_gain(db + 3 * drift(25) - 14 * away_s * (k > 8)) * np.sin(k * phase)
    return rack_gain(in_time(HORN_LEVEL)[0]) * tone


def scene():
    film = snaps() + rustle()
    bar = knocks() + slap_rings() + pad_taps()
    return film + room(film) + bar + street() + air() + insect() + horn()


def band_limit(x):
    return signal.sosfilt(signal.butter(12, 16490, fs=SR, output="sos"), x)


def record(dry):
    ports = np.vstack([colour(dry[0], TILT, 0.45), colour(dry[1], TILT, -0.23)])
    top_cut = signal.cheby2(10, 50, 16600, fs=SR, output="sos")
    mix = signal.sosfilt(top_cut, np.tanh(ports))
    return band_limit(mix)


dry = scene()
out = record(dry)
unload_audio(out)
```